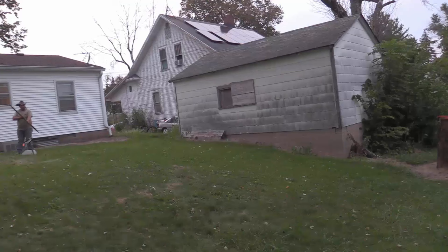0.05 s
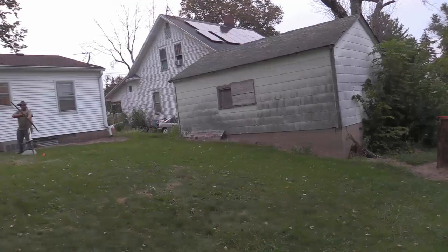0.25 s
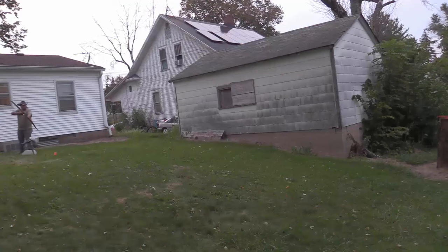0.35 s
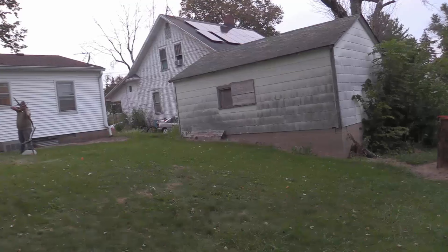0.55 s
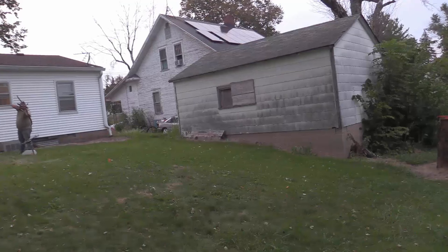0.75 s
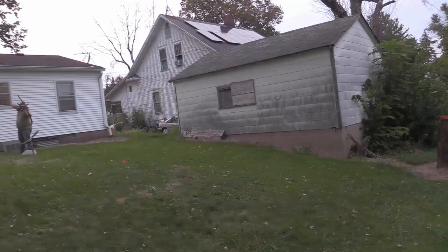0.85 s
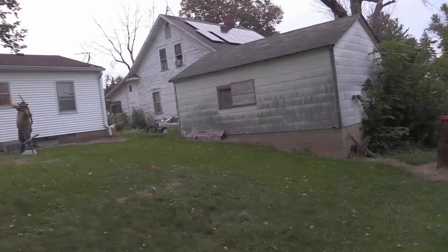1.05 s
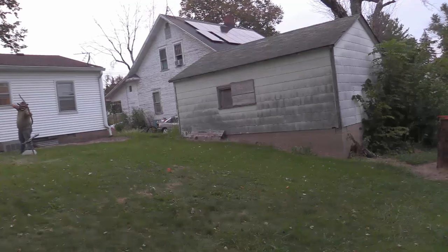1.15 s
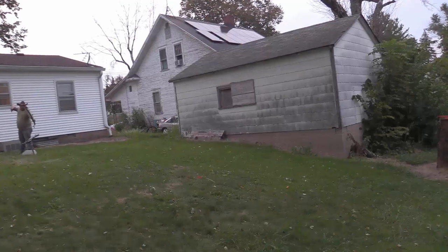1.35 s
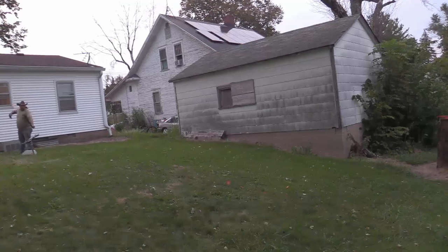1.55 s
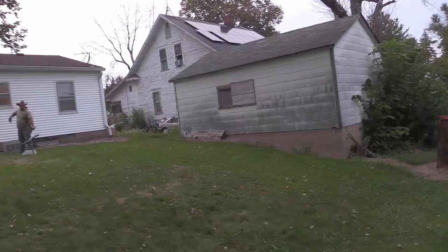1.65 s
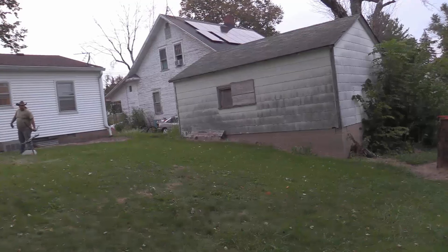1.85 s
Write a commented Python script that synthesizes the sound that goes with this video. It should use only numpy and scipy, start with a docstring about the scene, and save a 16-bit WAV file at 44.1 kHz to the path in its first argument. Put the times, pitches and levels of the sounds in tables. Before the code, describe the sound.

A swung cord whistles through three turns, then its weight hits with a sharp crack.

```python
"""Over faint outdoor hiss, a weighted cord is wound up in a grassy yard between houses, swishing and
ticking in the hand. It whirls through three whistling turns: the cord sheds vortices that sing at a
pitch set by its speed, while the weight hums lower and buffets the air. A last swish is the throw.
It lands with a hard double crack, a low thud and a short ring, and the walls throw the crack back."""
import sys
import numpy as np
from scipy import signal
from scipy.fft import rfft, irfft
from scipy.io import wavfile
from scipy.ndimage import uniform_filter1d

SR = 44100
rng = np.random.default_rng(int(sys.argv[2]) if len(sys.argv) > 2 else 0)


def bounce(signal):
    """Save signal as a 16-bit WAV file at the path given by the first command-line argument."""
    frames = np.transpose(np.atleast_2d(signal))
    limited = np.clip(frames, -1, 1)
    pcm = np.round(limited * 32767).astype(np.int16)
    wavfile.write(sys.argv[1], SR, pcm)


N = 83790

# colour of the outdoor bed (frequency [Hz], level [dB])
AIR_COLOUR = [(25, -41), (60, -18.5), (120, -10.5), (300, -6.5), (600, -8), (850, -6), (1400, -11.5),
              (2300, -16.5), (3300, -12.5), (5400, -4.5), (8000, -18.5), (11000, -26.5), (15000, -33),
              (16000, -42)]
# low whistle of the wind-up and the slow half of each turn (time [s], pitch [Hz], level [dB])
WIND_UP = [(0.135, 2110, -83), (0.155, 2302, -41), (0.213, 1840, -60), (0.223, 1895, -51),
           (0.253, 2222, -39), (0.321, 2280, -56.5), (0.355, 2160, -64), (0.39, 2300, -66)]
SLOW_PASS_1 = [(0.533, 2550, -46), (0.547, 2480, -42.5), (0.556, 2350, -30), (0.566, 2200, -39),
               (0.591, 2150, -44), (0.603, 2330, -39.5), (0.614, 2250, -44.5), (0.655, 2100, -44),
               (0.675, 1950, -44), (0.70, 1700, -55)]
SLOW_PASS_2 = [(0.826, 2300, -55), (0.843, 2550, -34), (0.862, 2780, -32), (0.882, 2650, -35.5),
               (0.897, 2350, -46.5), (0.92, 2020, -47), (0.965, 1800, -47.5), (0.99, 1650, -64)]
SLOW_PASS_3 = [(1.04, 1730, -67), (1.054, 1648, -61), (1.074, 1622, -45), (1.094, 1643, -58),
               (1.116, 2205, -80), (1.126, 2093, -48), (1.138, 2186, -43.5), (1.23, 2250, -67.5)]
# faders for the cord rushing through the hand (time [s], level [dB])
PICK_UP = [(0.14, -61), (0.154, -47), (0.196, -38), (0.226, -41.5), (0.248, -35), (0.288, -48), (0.36, -54),
           (0.396, -49), (0.41, -34)]
THROW = [(1.27, -59), (1.292, -57.5), (1.336, -44.5), (1.376, -57), (1.42, -56)]
# colour of that swish (frequency [Hz], level [dB])
SWISH_COLOUR = [(40, -22), (150, -9), (600, -13.5), (1100, -4), (1800, 5), (3500, 4.5), (5000, 3),
                (7000, 0), (9000, -6), (12000, -13), (16000, -24)]
# the cord shifting in the hand (time [s], level [dB])
TICKS = [(0.156, -50), (0.246, -33.5), (0.268, -38.5), (0.313, -44.5), (0.49, -25), (0.602, -38),
         (0.624, -39.5)]
# colour of the ticks and of the turbulent wake (frequency [Hz], level [dB])
HISS_COLOUR = [(40, -9), (200, -8), (1200, -8.5), (2500, -5.5), (4000, 0), (6000, 3), (7500, -2),
               (9000, -1), (10500, -4.5), (13000, -10), (16000, -14.5)]
# strands catching the air (time [s], pitch [Hz], glide [Hz/s], level [dB], decay [s])
STRANDS = [(0.181, 4620, -18000, -42, 0.055), (0.217, 1627, 15006, -36.5, .02),
           (0.4, 3660, 14002, -37.5, 0.03), (0.678, 5000, -1500, -33.5, 0.015),
           (0.458, 3624, -5000, -22.5, .016), (0.481, 3976, -12000, -31.5, 0.031),
           (0.734, 3564, 1991, -28, 0.016), (0.744, 4065, -1000, -33.5, 0.044),
           (0.83, 2217, 15994, -40, 0.024), (0.891, 3950, -1500, -37, 0.0072),
           (0.915, 3896, -1500, -21, 0.0037), (0.933, 1605, -1000, -45.5, 0.026),
           (1.022, 3710, -3000, -45.5, 0.037), (1.266, 3750, 7005, -52, 0.042)]
# puffs of pushed air (peak time [s], centre [Hz], width [Hz], level [dB], half-length [s])
PUFFS = [(0.25, 49.4, 40, -78, 0.034), (0.474, 90.3, 60, -54, 0.015), (0.477, 292.2, 201, -53, 0.019),
         (0.767, 148.3, 82.5, -55.5, 0.033), (0.912, 65, 55, -63.5, 0.017),
         (1.055, 140.6, 70, -54.5, 0.011), (1.321, 700, 750, -52, 0.021), (1.322, 170, 110, -58, 0.013),
         (1.347, 320, 127, -57, 0.03)]
# hum of the weight, one curve a turn (time [s], pitch [Hz], level [dB])
HUMS = [
    [(0.40, 678, -70), (0.417, 751, -47), (0.435, 795.4, -56), (0.455, 781.4, -35.5), (0.475, 607.5, -52.5),
     (0.497, 478, -42.5), (0.53, 423, -77)],
    [(0.675, 1200, -51), (0.70, 1094, -57.5), (0.722, 941, -40.5), (0.742, 633.4, -50.5),
     (0.79, 604.5, -54.5), (0.83, 543, -66)],
    [(0.975, 950, -62), (0.992, 780, -50), (1.015, 641, -55), (1.04, 519, -56), (1.08, 412, -69)],
]
# fast half of each turn (time [s], pitch [Hz], whistle level [dB], wake level [dB])
FAST_PASS_1 = [(0.405, 4650, -45, -46), (0.413, 4650, -30, -42), (0.439, 4673, -28.5, -31.5),
               (0.449, 4647, -19.5, -35), (0.473, 4560, -28, -32.5), (0.491, 4413, -23.5, -32.5),
               (0.527, 4324, -39, -48), (0.674, 4205, -51, -55.5)]
FAST_PASS_2 = [(0.674, 4970, -54, -61), (0.682, 4950, -33.5, -44.5), (0.698, 4847, -40, -45),
               (0.722, 4790, -22, -37.5), (0.738, 4710, -32, -35), (0.746, 4543, -26.5, -38.5),
               (0.778, 4323, -39, -40.5), (0.788, 4414, -29, -35), (0.796, 4425, -42, -44.5),
               (0.812, 4450, -29.5, -41.5), (0.832, 4480, -49, -54.5), (0.87, 4570, -45, -44),
               (0.89, 3970, -49, -54), (0.966, 4096, -51, -52.5), (0.975, 4330, -50, -62)]
FAST_PASS_3 = [(0.972, 4630, -60, -47), (0.982, 4630, -39, -43), (0.994, 4630, -31, -45),
               (1.018, 4570, -33.5, -40.5), (1.032, 4370, -39, -49.5), (1.054, 4080, -31, -45.5),
               (1.07, 4080, -51, -48), (1.076, 4180, -40, -45), (1.124, 4234, -47.5, -57.5),
               (1.162, 4240, -54, -60), (1.212, 4320, -69, -83), (1.22, 4360, -58, -68)]
# thin overtones in the wake (pitch [multiple of the whistle], level [dB])
OVERTONES = [(1.63, -10.5), (1.85, -7.5), (2.7, -17)]
# contacts of weight and cord (time [s], snap level [dB], ring level [dB])
CONTACTS = [(1.3154, -23.5, -50), (1.339, -23, -52), (1.431, -17, -43), (1.435, -36, -13), (1.4373, 1, -13),
            (1.4396, -5, -10), (1.441, 1, -6.5), (1.4427, -27, -4.5), (1.4502, -15, -14)]
# colour of one contact (frequency [Hz], level [dB])
SNAP_COLOUR = [(40, -36), (250, -18), (700, -16.5), (1400, -4), (2100, 1), (2900, 12), (4000, 4.5),
               (6000, 6), (7500, -4), (12000, -9), (16000, -22)]
# modes of the struck object (frequency [Hz], level [dB], T60 [s])
RING_MODES = [(2200, -24, 0.061), (2780, -28.5, 0.1), (2874, -30, 0.066), (3610, -34, 0.1),
              (4190, -42, 0.11), (5200, -31, .1), (5195, -27, .13), (5200, -30, .12), (6350, -31, 0.087),
              (6510, -41, 0.12), (9039, -51, .14)]
# colour of the crack's scattered tail (frequency [Hz], level [dB])
SCATTER_COLOUR = [(60, -19), (250, -9), (700, -9), (1800, -7.5), (2800, -5.5), (4000, 3.5), (5300, 3.5),
                  (7000, -1), (9000, -4), (12000, -14), (16000, -20)]
# dull body of the blow (frequency [Hz], level [dB])
THUD_COLOUR = [(25, -8), (55, 2), (110, 5), (170, -5), (280, 1), (450, -4), (900, -10), (3000, -50)]
# slapback from the house walls (delay [s], level [dB])
WALL_ECHOES = [(0.0426, -27), (.0455, -21.5), (.128, -29.5)]
# colour of the yard's reverb (frequency [Hz], level [dB])
YARD_COLOUR = [(50, 3), (250, 4), (700, 4.5), (2000, 4), (4000, -1), (6000, 2.5), (9000, 1.5), (12000, -2),
               (16000, -10)]
# EQ of the stereo side signal (frequency [Hz], gain [dB])
SIDE_EQ = [(30, -32), (500, -35), (1200, -35.5), (2800, -25), (5000, -40), (9000, -53), (14000, -38)]


def undb(db):
    """Decibels to gain."""
    return 10 ** (np.asarray(db) / 20)


def times():
    """Clock in seconds."""
    return np.arange(N) / SR


def unit(x):
    """Scale to rms 1."""
    return x / np.sqrt(np.mean(np.abs(x) ** 2))


def eq_curve(points):
    """Gain at each frequency bin from (frequency [Hz], level [dB]) points."""
    hz, db = np.array(points).T
    return undb(np.interp(np.log(np.fft.rfftfreq(N, 1 / SR) + 1), np.log(hz), db))


def noise(colour):
    """Noise of a given colour, rms 1."""
    return unit(irfft(rfft(rng.standard_normal(N)) * eq_curve(colour), N))


def fader(cues, db):
    """Ride a level curve, with a soft gate at its ends."""
    t = times()
    gate = uniform_filter1d(1. * ((t >= cues[0]) & (t <= cues[-1])), size=200)
    return undb(np.interp(t, cues, db)) * gate


def convolve(x, response):
    """Play a sound through a response."""
    return signal.fftconvolve(x, response)[:N]


def fade(t60):
    """Die away by 60 dB in t60 seconds."""
    return np.exp(-np.log(1000) * times() / t60)


def tail(x, t60):
    """Fade a signal out and scale it to unit energy."""
    return unit(x * fade(t60)) / np.sqrt(N)


def triggers(cues):
    """One impulse for each (time [s], level [dB]) cue."""
    pulses = np.zeros(N)
    for start, db in cues:
        pulses[int(start * SR)] += undb(db)
    return pulses


def envelope(pulses, shape):
    """Fire a shape at each pulse; overlaps add by energy."""
    return np.sqrt(np.abs(convolve(pulses ** 2, shape ** 2)))


def vortex(hz, width_hz, steady=0.34):
    """Vortex tone: a pitch whose phase and strength wander; steady evens the strength out."""
    lowpass = (1 + (1.27 * np.fft.fftfreq(N, 1 / SR) / width_hz) ** 2) ** -2
    white = rng.standard_normal(N) + 1j * rng.standard_normal(N)
    wander = unit(np.fft.ifft(np.fft.fft(white) * lowpass))
    wander = unit(wander / np.abs(wander) ** steady)
    carrier = np.exp(2j * np.pi * np.cumsum(hz * np.ones(N)) / SR)
    return np.sqrt(2) * np.real(wander * carrier)


def flutter(depth_db=2.5):
    """Quick uneven swelling of the turbulence, as a gain."""
    return unit(undb(depth_db * vortex(0, width_hz=130, steady=0)))


def outdoor_air():
    """A faint, steady bed of outdoor hiss."""
    return undb(-56.5) * noise(AIR_COLOUR)


def slow_whistle():
    """In the wind-up and on the slow side of the circle the cord sings about an octave lower."""
    out = 0
    for curve in (WIND_UP, SLOW_PASS_1, SLOW_PASS_2, SLOW_PASS_3):
        cues, hz, db = np.array(curve).T
        pitch = np.interp(times(), cues, hz)
        core = vortex(pitch, width_hz=240)
        breath = undb(-3.5) * vortex(pitch, width_hz=1140)
        out += fader(cues, db) * (core + breath)
    return undb(-4) * out * flutter()


def hand_swish():
    """The cord rushes tonelessly through the hand as it is picked up and let go."""
    level = sum(fader(*np.array(curve).T) for curve in (PICK_UP, THROW))
    return undb(-1.5) * noise(SWISH_COLOUR) * flutter() * level


def hand_ticks():
    """The cord shifts in the hand with short dry ticks."""
    return noise(HISS_COLOUR) * envelope(triggers(TICKS), fade(t60=0.019))


def strand_chirps(attack_s=0.005):
    """Single strands chirp, gliding as they speed up or slow down."""
    out = 0
    for start, hz, glide, db, decay_s in STRANDS:
        age = np.maximum(times() - start, 0)
        shape = np.minimum(age / attack_s, 1) * np.exp(-age / decay_s)
        pitch = hz + glide * np.minimum(age, 2 * decay_s)
        out += undb(db) * shape * vortex(pitch, width_hz=290, steady=0.51)
    return out


def air_puffs():
    """Soft low swells of pushed air and swinging clothes."""
    out = 0
    for peak, hz, width_hz, db, half_length in PUFFS:
        swell = np.exp(-0.5 * ((times() - peak) / half_length) ** 2)
        out += undb(db) * swell * vortex(hz, width_hz)
    return out


def weight_hum():
    """The thick weight sings low and falls in pitch as it passes."""
    out = 0
    for curve in HUMS:
        cues, hz, db = np.array(curve).T
        out += fader(cues, db) * vortex(np.interp(times(), cues, hz), width_hz=296)
    return undb(-1) * out


def fast_whistle(fray_s=0.18, wake_build_s=0.022):
    """On each fast pass a clean whistle frays into a band, over the fluttering hiss of the wake."""
    t, out = times(), 0
    for curve in (FAST_PASS_1, FAST_PASS_2, FAST_PASS_3):
        cues, hz, whistle_db, wake_db = np.array(curve).T
        pitch = np.interp(t, cues, hz)
        age = np.maximum(t - cues[0], 0)
        clean = np.exp(-(age / fray_s) ** 2)
        tone = vortex(pitch, width_hz=243, steady=0.65)
        frayed = vortex(0.96 * pitch, width_hz=730, steady=0.2) * flutter()
        whistle = clean * tone + np.sqrt(1 - clean ** 2) * frayed  # equal-power crossfade
        overtones = sum(undb(db) * vortex(ratio * pitch, width_hz=440, steady=0) * flutter()
                        for ratio, db in OVERTONES)
        # the octave gives way to hiss as the wake turns turbulent
        turbulence = 1 - 0.45 * np.exp(-age / wake_build_s)
        wake = turbulence * (undb(-1) * noise(HISS_COLOUR) + overtones) * flutter()
        octave = undb(-7) * clean / np.sqrt(turbulence) * vortex(2 * pitch, width_hz=290)
        out += fader(cues, whistle_db) * whistle + fader(cues, wake_db) * (wake + octave)
    return out


def crack(scatter_build_s=0.008):
    """Each contact snaps, rattles and rings the struck object; the yard scatters a noisy tail."""
    t = times()
    snaps = triggers((start, db) for start, db, _ in CONTACTS)
    pushes = triggers((start, db) for start, _, db in CONTACTS)
    # minimum phase packs the snap's colour into one sharp transient
    cepstrum = irfft(np.log(eq_curve(SNAP_COLOUR)), N)
    causal = 2 * cepstrum * (t > 0) * (t < t[-1] / 2)
    snap = unit(irfft(np.exp(rfft(causal)), N)) / np.sqrt(N)
    rattle = undb(-1) * noise(SNAP_COLOUR) * envelope(snaps, tail(1, t60=0.064))
    ring = sum(undb(db) * fade(t60) * np.sin(2 * np.pi * hz * t) for hz, db, t60 in RING_MODES)
    hit = convolve(snaps, snap) + rattle + convolve(pushes, ring)
    bloom = fade(t60=0.45) * np.minimum(t / scatter_build_s, 1)
    scatter = undb(-34.5) * noise(SCATTER_COLOUR) * envelope(snaps, bloom)
    return yard(hit, reverb_db=-23.5) + scatter


def thud(attack_s=0.0027, t60=0.35):
    """The hardest contact also shakes the struck object at low pitch."""
    start, _, _ = max(CONTACTS, key=lambda contact: contact[1])
    age = np.maximum(times() - start, 0)
    shape = np.minimum(age / attack_s, 1) * np.exp(-np.log(1000) * age / t60)
    return undb(-57) * noise(THUD_COLOUR) * shape


def yard(x, reverb_db, build_s=0.0075):
    """Add slapback from the house walls and a short diffuse reverb."""
    diffuse = noise(YARD_COLOUR) * np.minimum(times() / build_s, 1)
    response = undb(reverb_db) * tail(diffuse, t60=0.45)
    for delay, db in WALL_ECHOES:
        response[int(delay * SR)] += undb(db)
    return x + convolve(x, response)


def scene():
    """Wind-up, turns and landing in the yard over the outdoor bed, nearly mono."""
    swing = slow_whistle() + hand_swish() + hand_ticks() + strand_chirps()
    swing += air_puffs() + weight_hum() + fast_whistle()
    mid = outdoor_air() + yard(swing, reverb_db=-13) + crack() + thud()
    side = irfft(rfft(mid) * eq_curve(SIDE_EQ), N)
    side = convolve(side, tail(rng.standard_normal(N), t60=0.019))  # a short smear for width
    return np.array([mid + side, mid - side])


def record(dry, cutoff_hz=15900):
    """A steep low-pass trims the very top."""
    return signal.sosfilt(signal.ellip(8, 0.2, 70, cutoff_hz, fs=SR, output="sos"), dry)


dry = scene()
out = record(dry)
bounce(out)
```